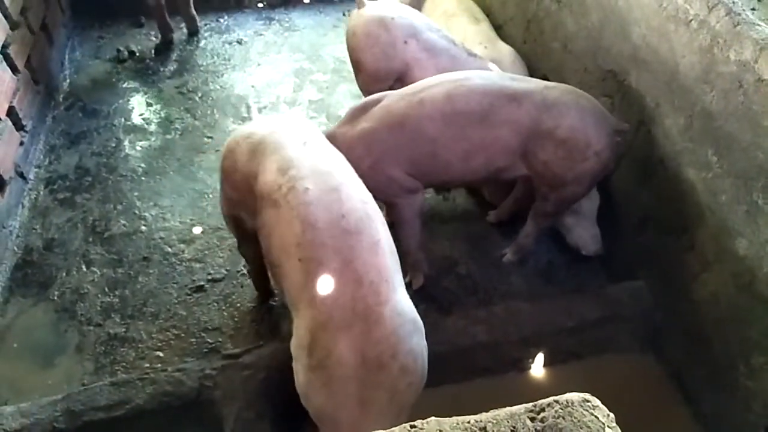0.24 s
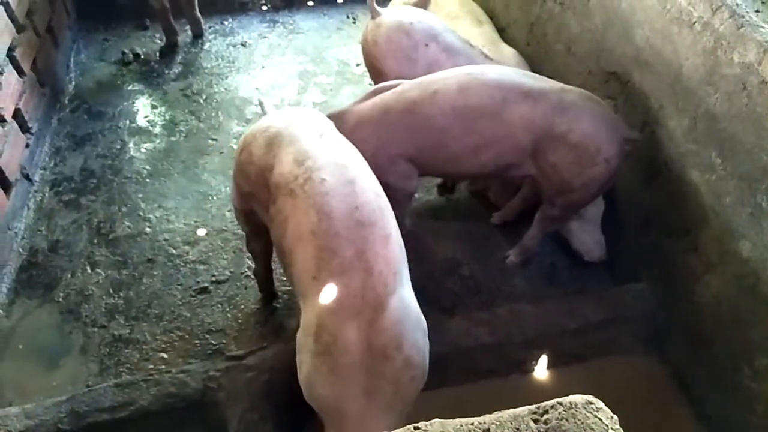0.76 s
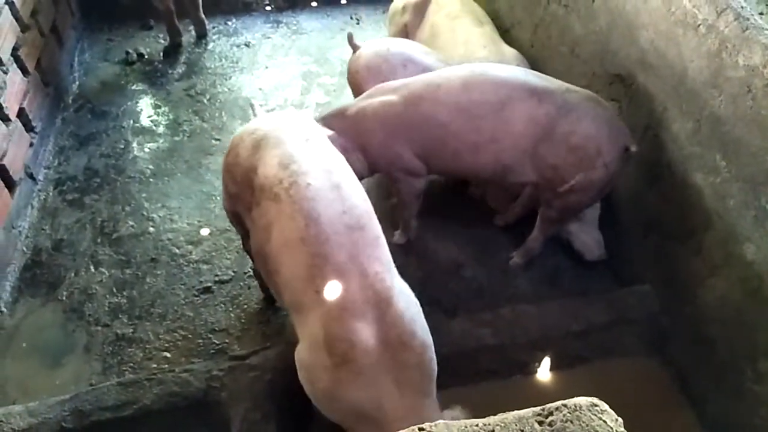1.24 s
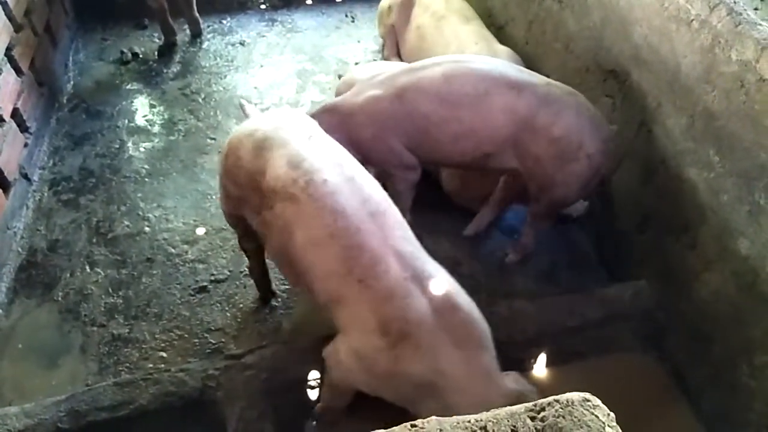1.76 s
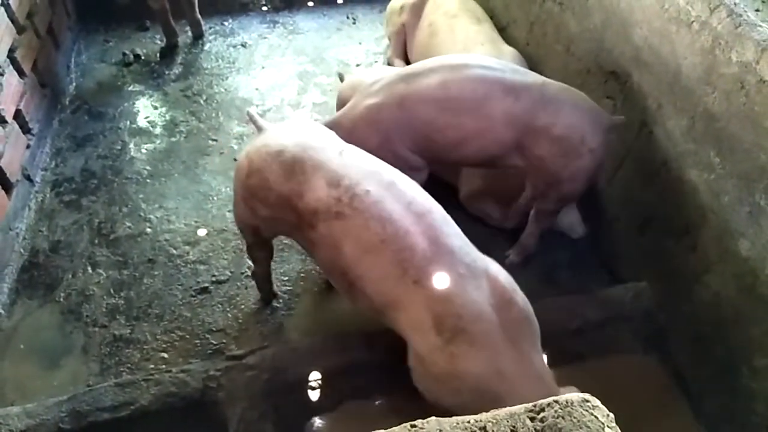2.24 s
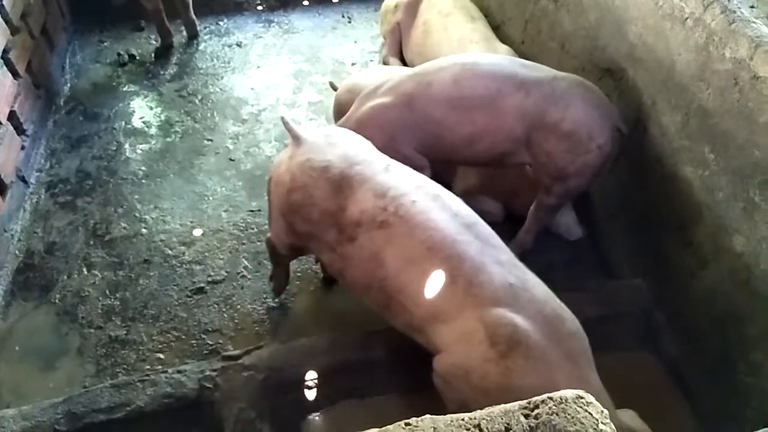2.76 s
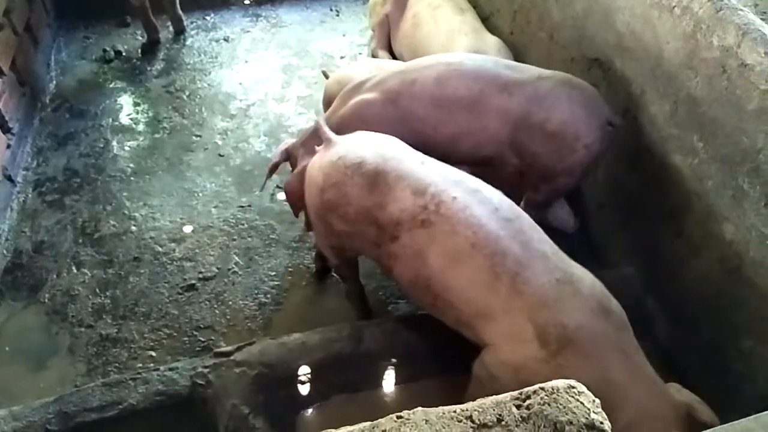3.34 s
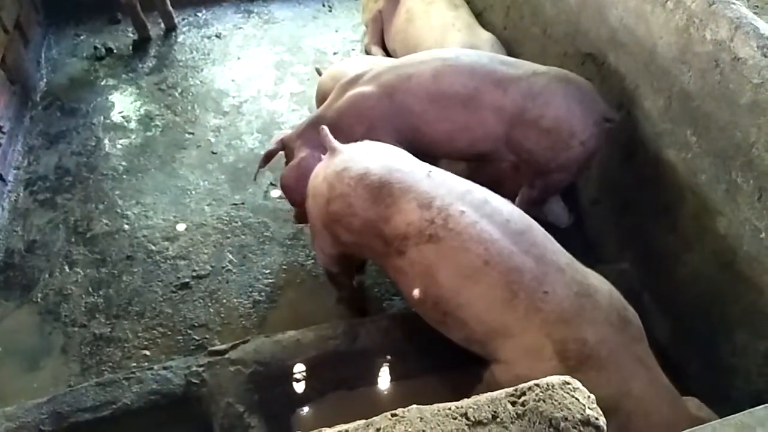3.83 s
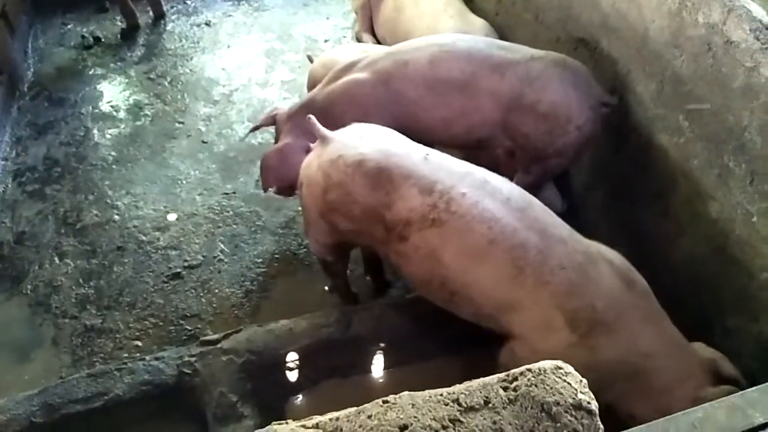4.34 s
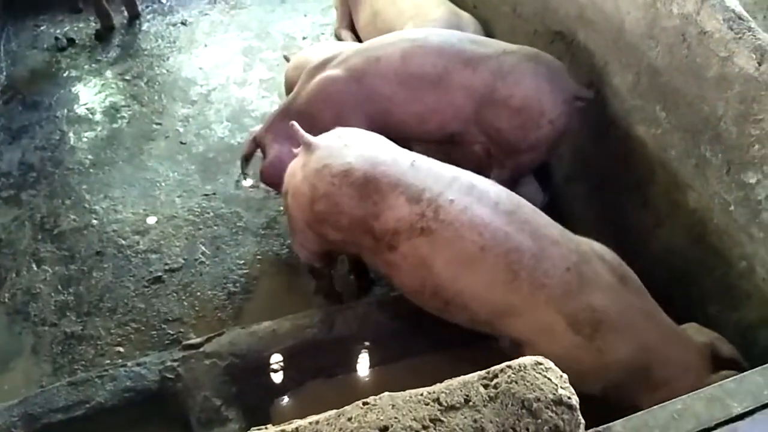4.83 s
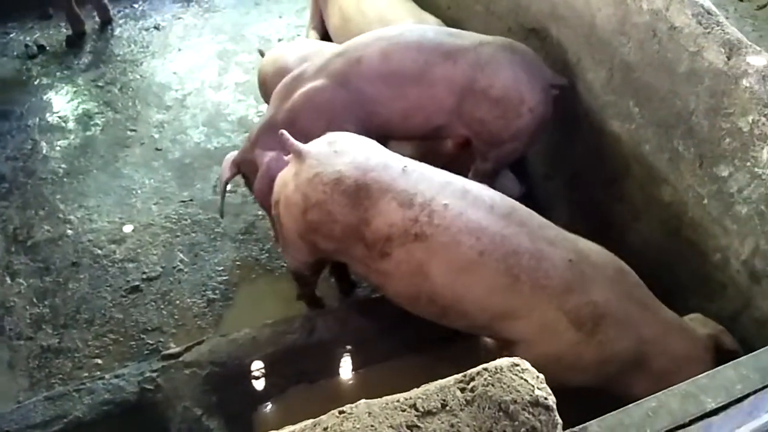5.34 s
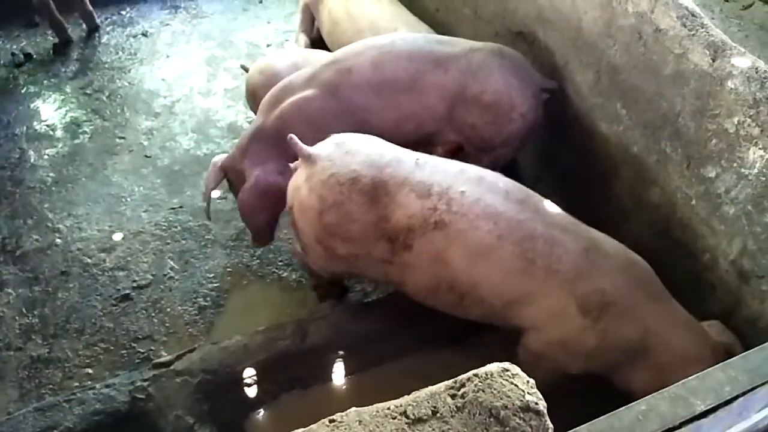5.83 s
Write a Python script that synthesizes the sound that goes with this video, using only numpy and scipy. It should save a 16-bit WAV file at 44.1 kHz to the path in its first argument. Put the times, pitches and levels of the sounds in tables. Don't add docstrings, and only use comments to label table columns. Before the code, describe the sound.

Pigs grunt low and rough while snouts slurp, smack and splash in a shallow puddle inside a bare, echoing concrete pen.

```python
import sys
import numpy as np
from scipy import signal
from scipy.fft import rfft, irfft
from scipy.io import wavfile
from scipy.ndimage import uniform_filter1d

SR = 44100
rng = np.random.default_rng(int(sys.argv[2]) if len(sys.argv) > 2 else 0)


def materialize(psi):
    bounded = np.clip(np.atleast_2d(psi).T, -1, 1)
    quanta = np.round(bounded * 32767).astype(np.int16)
    wavfile.write(sys.argv[1], SR, quanta)


def ratio(d):
    e = np.asarray(d, float) / 20
    return 10 ** e


N = 268436

# frequency in Hz, level in dB per Hz.
AIR_SPECTRUM = [(26, 2), (71, 1), (422, -8.5), (976, -13.5), (1270, -23), (2140, -13), (6260, -20),
                (15600, -17.5)]
# frequency in Hz, t60 in seconds.
PEN_DECAY = [(200, 0.45), (1500, 0.38), (5000, 0.42), (12000, 0.41)]
# start in seconds, peak level in dB, pitch in Hz.
THUDS = [(0.031, -34.5, 50.8), (0.277, -43.5, 64.4), (0.655, -33.5, 86.5), (0.816, -35.5, 59),
         (1.602, -41.5, 82), (1.915, -37.5, 78.4), (2.16, -44, 58), (2.4, -45, 79), (2.582, -33, 92.3),
         (3.008, -34.5, 69.4), (3.281, -46, 62.5), (4.367, -39.5, 82), (5.191, -43, 58.4),
         (5.829, -44.5, 107.7), (5.947, -52.5, 148.5)]
# start in seconds, length in seconds, level in dB, pitch in Hz.
SQUEALS = [(4.104, 0.23, -57.5, 671.7)]
SQUEAL_TONES_DB = (-0.5, 4.5, 5.5)
# frequency in Hz, t60 in seconds.
RING_MODES = [(5755, 0.24), (6655, 0.24), (10555, 0.042), (13440, 0.11)]
# start in seconds, first mode in dB, then three upper modes in dB over the first.
CLINKS = [(0.9879, -60.5, -21, -35, -25), (1.822, -73.5, 17, -14, 3), (2.177, -56.5, 1.5, -25, -18),
          (2.368, -52.5, -6, -20, -25), (2.6808, -46, -1.5, -5, -16), (2.8433, -44.5, -17, -7, -14),
          (3.101, -45, -16.5, -6, -6), (3.488, -54, -1.5, -23, -17), (3.982, -63, 4, -42, -51),
          (4.52, -59, -16, -12, 1), (5.581, -59, 7, -3, -22)]
# time in seconds, level in dB.
STIRRING = [(0.0, -32), (0.27, -52.5), (0.68, -50.5), (1.4, -52), (1.54, -45.5), (1.81, -43), (2.52, -48),
            (2.83, -47.5), (3.19, -53), (3.41, -64), (3.56, -54), (3.78, -54), (4.32, -47.5), (4.95, -53),
            (5.22, -53), (5.53, -68), (5.69, -43.5), (6.09, -46.5)]
# frequency in Hz, level in dB per Hz.
GURGLE_SPECTRUM = [(290, -73), (500, -9.5), (1300, 1.5), (2390, 0), (3300, -11.5), (4290, -59),
                   (7260, -120)]
# frequency in Hz, level in dB per Hz.
FIZZ_SPECTRUM = [(1410, -29), (2400, -2.5), (3810, -6.5), (4950, -3.5), (7500, -22.5), (9750, -44),
                 (16500, -120)]
# frequency in Hz, level in dB per Hz.
SNIFF_SPECTRUM = [(4410, -31), (7500, -9), (9190, -13), (10500, -13), (12700, -1), (15600, -9.5)]
# start in seconds, splash in dB, hiss in dB over it, rise in seconds,
# t60 in seconds.
SPRAYS = [(0.004, -25.5, -12, 0.14, 0.092), (5.98, -36, -16, 0.045, 0.39), (1.63, -45.5, -2, 0.01, 0.71),
          (1.6894, -57, 15, 0.014, 0.05), (2.128, -36.5, -0.5, 0.047, 0.18), (2.33, -35, -9, 0.015, 0.16),
          (2.546, -29.5, -39, 0.1, 0.29), (3.3283, -47, 20.5, 0.0023, 0.036), (3.35, -42, -36, 0.003, 0.14),
          (3.625, -32, -21, 0.0062, 0.053), (4.02, -38, -13, 0.019, 0.22),
          (4.638, -23, -15.5, 0.011, 0.095), (4.692, -23, 5, 0.014, 0.048), (4.897, -23, -7, 0.04, 0.1),
          (4.82, -38.5, 2.5, 0.03, 0.12), (5.109, -42, -4, 0.0021, 0.17), (5.498, -25, 2, 0.023, 0.041),
          (5.878, -25, 3.5, 0.017, 0.043)]
# start in seconds, peak level in dB, pitch in Hz.
TICKS = [
    (3.018, -30.5, 4250),
    (3.576, -49, 1530),
    (4.292, -35, 2730),
    (4.707, -39, 10500),
    (4.717, -32, 9000),
    (4.749, -33, 1320),
    (4.927, -34, 2600),
]
# start in seconds, length in seconds, level in dB, pitch in Hz.
LOW_WHISTLES = [(0.085, 0.065, -38.5, 454), (0.2, 0.089, -59, 1846), (0.464, 0.2, -57, 897),
                (0.484, 0.089, -67, 330), (0.519, 0.087, -66, 1310), (0.534, 0.092, -44.5, 352),
                (0.574, 0.085, -52.5, 1575), (0.639, 0.076, -41, 228), (0.763, 0.086, -61, 2050),
                (0.883, 0.052, -51.5, 379), (1.217, 0.09, -60, 1630), (1.586, 0.18, -59, 2095),
                (1.606, 0.13, -55, 1966), (1.756, 0.1, -47, 369), (1.951, 0.1, -56, 802),
                (1.956, 0.105, -51, 250), (2.095, 0.14, -53, 2154), (2.27, 0.053, -52, 1300),
                (2.27, 0.17, -58, 1236), (2.365, 0.12, -60, 864), (2.619, 0.16, -54, 1396),
                (2.619, 0.18, -52, 2154), (2.639, 0.115, -54, 1900), (2.649, 0.076, -47.5, 842),
                (2.878, 0.053, -50, 1710), (2.933, 0.099, -52, 1068), (3.332, 0.095, -41, 296.5),
                (3.347, 0.065, -50.5, 890), (3.756, 0.13, -56, 1517), (4.011, 0.13, -55.5, 1600),
                (4.295, 0.077, -50, 1455), (4.33, 0.2, -55, 1234), (4.44, 0.19, -57, 1886),
                (4.834, 0.051, -57, 2080), (4.999, 0.15, -61, 1606), (5.059, 0.14, -58, 1086),
                (5.667, 0.079, -42, 1450), (5.762, 0.038, -51, 1340), (5.767, 0.071, -42, 367),
                (5.882, 0.12, -59.5, 330)]
# start in seconds, length in seconds, level in dB, pitch in Hz.
HIGH_WHISTLES = [(0.0, 0.059, -44, 3220), (0.0, 0.074, -51, 3860), (0.005, 0.15, -47, 2510),
                 (0.02, 0.19, -49, 2357), (0.389, 0.11, -61.5, 3020), (0.459, 0.1, -62, 4590),
                 (0.614, 0.073, -42, 2500), (0.649, 0.092, -42.5, 2280), (0.833, 0.12, -59.5, 2645),
                 (1.796, 0.067, -44, 2520), (1.816, 0.084, -42.5, 2852), (1.985, 0.13, -56, 3470),
                 (2.115, 0.16, -61, 3010), (2.115, 0.21, -59, 5100), (2.335, 0.063, -51.5, 2865),
                 (2.619, 0.18, -52, 2730), (2.724, 0.075, -55, 2960), (2.849, 0.12, -57, 4770),
                 (2.883, 0.1, -49, 2430), (2.913, 0.087, -54, 2263), (3.098, 0.072, -57.5, 2260),
                 (3.357, 0.069, -40, 2310), (3.362, 0.076, -44, 3310), (3.372, 0.066, -48, 4600),
                 (3.9, 0.099, -66, 3970), (3.92, 0.1, -61.5, 3060), (4.225, 0.1, -51, 2330),
                 (4.24, 0.072, -58.5, 6030), (4.26, 0.12, -43.5, 2868), (4.52, 0.09, -58.5, 2986),
                 (4.535, 0.1, -58.5, 2820), (4.624, 0.082, -55, 4660), (4.629, 0.07, -48.5, 3040),
                 (4.694, 0.04, -52, 2260), (4.739, 0.06, -45.5, 2930), (4.819, 0.08, -58, 4920),
                 (4.939, 0.049, -46.5, 2375), (4.999, 0.18, -58, 4990), (5.478, 0.11, -53.5, 2250),
                 (5.657, 0.12, -40.5, 2352), (5.672, 0.14, -54, 4510), (5.677, 0.06, -49, 2760),
                 (5.917, 0.11, -50, 3020), (6.036, 0.055, -53, 3680)]
# start in
# seconds, peak level in dB, pitch in Hz, # width as a share # of the pitch, t60 in seconds.
HOLLOWS = [(0.86, -48, 3075, 0.046, 0.56), (0.97, -43, 2110, 0.16, 0.22), (1.141, -48, 3000, .08, 0.46),
           (1.37, -46.5, 676, 0.32, .06), (2.228, -44, 7570, 0.06, 0.02), (2.44, -45.5, 1270, .14, 0.18),
           (3.37, -36.5, 5090, 0.12, 0.11), (4.001, -49, 250, 0.21, 0.11), (4.119, -46, 3310, 0.17, 0.09),
           (4.36, -44.5, 5100, 0.16, 0.15), (4.39, -53, 1974, 0.025, 0.66), (4.53, -45.5, 1244, 0.11, 0.58),
           (5.099, -41.5, 1597, 0.1, 0.35), (5.25, -47.5, 2130, .07, .36), (5.295, -52, 3740, 0.08, 0.52),
           (5.331, -50.5, 4970, 0.24, 0.4)]
# start in seconds, peak level in dB, cavity pitch
# in Hz, width as a share of the pitch, # t60 in seconds.
SNORTS = [
    (1.103, -47.5, 193, 0.65, 0.094),
    (1.289, -49, 349, 0.26, 0.42),
    (1.58, -41, 187, 0.98, 0.072),
    (1.611, -45.5, 170, 0.47, 0.063),
    (3.887, -49, 530, 0.27, 0.05),
    (4.038, -42.5, 695, 0.92, 0.71),
    (4.599, -51.5, 614, 0.069, 0.11),
    (0.455, -46.5, 362, 0.18, 1),
]
# start in seconds, peak level in dB, cavity pitch in Hz, t60 in seconds.
DRIPS = [(0.4514, -46.5, 3340, 0.44), (1.0676, -42, 4360, 0.05), (1.242, -42.5, 4260, 0.18),
         (1.719, -41.5, 4010, 0.026), (2.142, -43, 4050, 0.081), (2.2314, -44.5, 3770, 0.26),
         (2.8194, -30.5, 5070, 0.03), (3.019, -32.5, 4510, 0.029), (3.3535, -33, 3680, 0.18),
         (4.2302, -53, 6000, 0.39), (4.2792, -44, 5170, 0.21), (4.909, -41, 4270, .073),
         (5.4983, -37, 4920, 0.028), (5.8291, -36, 3370, 0.25)]
# start in seconds, peak level in dB, cavity pitch in Hz, t60 in seconds.
PLOPS = [(0.379, -47, 756, 0.2), (0.587, -31.5, 2820, 0.12), (0.986, -51, 890, 0.06),
         (1.098, -49.5, 834, 0.088), (1.1054, -43, 2050, 0.62), (1.521, -34.5, 2310, 0.032),
         (2.2001, -29.5, 1684, 0.051), (2.5466, -23, 3370, 0.062), (2.571, -26, 3380, 0.049),
         (3.0574, -46.5, 3130, 0.17), (3.5755, -43.5, 1610, 0.035), (3.7742, -39, 2104, 0.043),
         (3.9, -41.5, 1450, 0.21), (4.0286, -30.5, 2190, 0.013), (4.291, -29.5, 2735, 0.027),
         (4.6423, -31, 1850, 0.2), (4.651, -36, 1137, 0.037), (5.426, -51, 890, 0.054),
         (5.496, -30, 2390, 0.059), (5.642, -29.5, 2990, 0.14), (5.6979, -20.5, 2810, 0.079)]
# start in seconds, peak level in dB, cavity pitch in Hz, t60 in seconds.
SMACKS = [(0.4968, -38, 2470, 0.13), (0.6801, -20, 2410, 0.047), (1.0092, -39.5, 2770, 0.2),
          (1.244, -29.5, 2040, 0.068), (1.2863, -35, 3666, 0.094), (1.4601, -39, 2020, 0.35),
          (1.693, -32.5, 2910, 0.13), (2.0071, -41.5, 4970, 0.14), (2.2692, -30, 2090, 0.07),
          (2.825, -29.5, 2700, 0.087), (2.8955, -23.5, 1985, 0.043), (2.9473, -33.5, 4680, 0.059),
          (3.371, -24, 3400, 0.042), (3.6249, -34, 1840, 0.2), (3.627, -36, 3590, 0.34),
          (4.642, -29.5, 3530, 0.099), (4.7132, -31.5, 2300, 0.18), (4.7512, -29.5, 1490, 0.053),
          (4.9084, -33, 2110, 0.24), (5.0097, -33.5, 2680, 0.23), (5.5199, -37, 2320, 0.2),
          (5.9374, -37, 4530, 0.083)]
# start in seconds, peak level in dB, cavity pitch in Hz, t60 in seconds.
GULPS = [(1.241, -33, 1050, 0.19), (1.621, -41.5, 950, 0.66), (2.132, -30.5, 816, 0.03),
         (2.199, -29, 964, 0.02), (2.738, -37, 812, 0.043), (2.903, -32.5, 1490, 0.23),
         (3.574, -46.5, 980, 0.18), (3.623, -38, 830, 0.21), (3.665, -34, 870, 0.021),
         (4.022, -39.5, 950, 0.13), (4.75, -29.5, 1105, 0.011), (4.919, -36.5, 1290, 0.12),
         (5.648, -43.5, 367, 0.31)]
# start in seconds, peak level in dB, cavity pitch in Hz, t60 in seconds.
LIP_CLICKS = [
    (2.133, -30, 797, 0.016),
    (2.199, -39, 1670, 0.026),
    (2.896, -22.5, 1820, 0.026),
    (4.714, -23, 2410, 0.035),
    (4.749, -26.5, 1372, 0.024),
    (5.497, -40.5, 2340, 0.069),
]
# time in seconds, pitch in Hz, first harmonic in dB, second in dB.
CLEAR_VOICES = [
    [(2.515, 249, -54, -74), (2.531, 246, -36, -82), (2.543, 240.5, -33.5, -56),
     (2.617, 260.5, -22.5, -31.5), (2.633, 256.8, -57, -59), (2.669, 252.8, -32, -45),
     (2.693, 269, -38.5, -72), (2.705, 242, -54, -57), (2.75, 232, -71, -54)],
    [(3.325, 338, -46, -87), (3.345, 341, -48, -93), (3.349, 343, -49, -73), (3.381, 347, -40, -71),
     (3.389, 358, -30.5, -50), (3.427, 358, -31.5, -71), (3.503, 336, -54, -82), (3.519, 354, -76, -88),
     (3.56, 366, -69, -77)],
    [(5.645, 203, -64, -59), (5.671, 205, -53, -33), (5.699, 212.5, -32.5, -39.5),
     (5.735, 244.3, -31.5, -52), (5.793, 235.3, -33, -34.5), (5.803, 231, -50, -62),
     (5.835, 244.6, -54, -45), (5.857, 243, -59, -73), (5.87, 242, -64, -48)],
]
# start, peak and end in seconds, peak effort in dB, chest pitch in Hz.
GRUNTS = [
    (-0.07, 0.102, 0.34, -28.5, 355),
    (0.568, 0.689, 0.92, -29.5, 346.4),
    (1.759, 1.849, 2.001, -29, 348),
    (3.326, 3.402, 3.57, -29.5, 351),
    (4.211, 4.344, 4.47, -36.5, 317.8),
    (5.029, 5.074, 5.225, -43.5, 364.7),
    (2.514, 2.6, 2.705, -21.5, 261.5),
    (5.642, 5.734, 5.95, -32, 239.6),
]
# chest cycles per fold pulse, roughness 0-1, overtone in dB, undertone in dB.
VOICES = [(6.7, .65, -7.5, -2), (4.0, 0.75, -8.5, -6), (5.5, 0.75, -9, -3), (1.3, 0.7, -26, -20),
          (5.4, .6, -29, -8), (5.0, 0.93, -0.5, -37), (2.3, .5, -9, -7), (2, 0.4, -1, -19)]
# mouth in Hz, mouth in dB over the chest, snout in Hz, snout in dB over the chest.
HEADS = [(1516, -6.5, 3150, -9.5), (1490, -3.5, 3000, -6), (1550, -4, 2670, -5), (886, -14, 2130, -8),
         (1600, -2, 2500, 2), (890, 2.3, 2040, 3.5), (1123, -13, 2220, -14.5), (1357, 0.5, 2440, -5.5)]
CHEST_DB = [-2.5, 0, -2, -8.5, -0.1, 2.5, -3.5, 0]


def evened(x):
    return x / np.sqrt(np.mean(x ** 2) + 1e-20)


def read(points, hz):
    f, value = np.transpose(points)
    return np.interp(np.log(hz + 1), np.log(f + 1), value)


def add(mix, s, sound):
    part = mix[round(s * SR):][:len(sound)]
    part += sound[:len(part)]


def colour(x, points):
    gain = ratio(read(points, np.fft.rfftfreq(len(x), 1 / SR)))
    return evened(irfft(rfft(x) * gain, len(x)))


def resonate(x, hz, width):
    turn = np.exp(2j * np.pi * np.cumsum(hz * np.ones(len(x))) / SR)
    r = np.exp(-np.pi * width / SR)
    smooth = signal.lfilter([(1 - r) ** 2], [1, -2 * r, r * r], x / turn + 1e-18)
    return 2 * (turn * smooth).real


def patchy(patchy_db, frames, bins):
    a, b, patches = rng.standard_normal((N // 128 + 5, 257, 3)).T
    patches = evened(uniform_filter1d(uniform_filter1d(patches, bins, 0), frames, 1))
    return signal.istft((a + 1j * b) * ratio(patchy_db * patches), nperseg=512, noverlap=384)[1][:N]


def room_air():
    return ratio(-65.5) * colour(patchy(0.46, 20, 6), AIR_SPECTRUM)


def pen(x, wet_db):
    taps = np.zeros(SR)
    at = np.arange(200, SR - 20, 20)
    taps[at + rng.integers(0, 20, len(at))] = rng.choice([-1., 1.], len(at))
    hz, t, z = signal.stft(taps, SR, nperseg=256)
    tail = signal.istft(z * ratio(-60 * t / read(PEN_DECAY, hz)[:, None]), SR, nperseg=256)[1]
    return x + ratio(wet_db) * signal.fftconvolve(x, tail / np.linalg.norm(tail))[:N]


def thuds():
    out, t = np.zeros(N), np.arange(SR // 2) / SR
    t60_s, rise_s = 0.34, 0.013
    for (s, db, hz), noise in zip(THUDS, rng.standard_normal((len(THUDS), len(t)))):
        shake = np.sin(2 * np.pi * hz * t) + 0.73 * evened(resonate(noise, hz, 58))
        add(out, s, ratio(db - 60 * t / t60_s) * (1 - np.exp(-t / rise_s)) * shake)
    hum = evened(resonate(patchy(4.5, 20, 2), 56.7, 24))
    return out + ratio(-62.0) * hum


def squeals():
    out = np.zeros(N)
    pitch_wobble = 0.0084
    for s, length, db, hz in SQUEALS:
        drift = uniform_filter1d(rng.standard_normal((round(length * SR), 4)), size=1500, axis=0).T
        turns = np.cumsum(hz * (1 + pitch_wobble * evened(drift[0]))) / SR
        voice = np.zeros(len(turns))
        for k, tone_db in enumerate(SQUEAL_TONES_DB, 1):
            voice += ratio(tone_db + 1.5 * evened(drift[k])) * np.sin(2 * np.pi * k * turns)
        add(out, s, ratio(db) * voice * signal.windows.tukey(len(turns), .3))
    return out


def clinks():
    out, t = np.zeros(N), np.arange(SR // 2) / SR
    attack = 1 - np.exp(-t / 0.00065)
    for s, db, *upper in CLINKS:
        rattle = 1 + 0.2 * evened(uniform_filter1d(rng.standard_normal(len(t)), size=300))
        for (hz, t60), rel_db in zip(RING_MODES, [0, *upper]):
            add(out, s, ratio(db + rel_db - 60 * t / t60) * np.sin(2 * np.pi * hz * t) * attack * rattle)
    return out


def bubbles(points, per_s, lo_hz, hi_hz, wash_db):
    size = ratio(2.5 * np.minimum(rng.exponential(1, N), 2.0)) * (rng.random(N) < per_s / SR)
    kind, out = rng.integers(0, 24, N), np.zeros(N)
    for k, hz in enumerate(np.geomspace(lo_hz, hi_hz, 24)):
        u = np.arange(1200) / SR * hz
        chirp = np.sin(2 * np.pi * (u + 0.00311 * u ** 2))
        grain = chirp * np.exp(-u / 7.9) * (1 - np.exp(-u / 2.0))
        out += signal.oaconvolve(size * (kind == k), grain * np.sqrt(hz / hi_hz))[:N]
    wet = pen(evened(out), 12.8)
    wash = colour(patchy(3.5, 50, 1), points)
    flat = [(f, db + 10 * np.log10(f / points[0][0])) for f, db in points]
    return evened(colour(wet, flat) + ratio(wash_db) * wash)


def puddle():
    t, froth = np.arange(N) / SR, np.zeros(N)
    froth_db, froth_t60_s, fizz_db = -32, 1, -10.5
    for s, db, *_ in SPRAYS:
        add(froth, s, ratio(db + froth_db - 60 * t[:SR] / froth_t60_s))
    stir = ratio(-2.5 + np.interp(t, *np.transpose(STIRRING)))
    gurgle = stir * bubbles(GURGLE_SPECTRUM, 500, 504.0, 3248, -8)
    fizz = (ratio(fizz_db) * stir + froth) * bubbles(FIZZ_SPECTRUM, 160, 2442, 6510, -7)
    return gurgle + fizz


def ticks():
    out, t = np.zeros(N), np.arange(2000) / SR
    decay_cycles = 1.3
    for s, db, hz in TICKS:
        add(out, s, ratio(db) * np.sin(2 * np.pi * hz * t) * np.exp(-t * hz / decay_cycles))
    return out


def sprays():
    splash, hiss, t = np.zeros(N), np.zeros(N), np.arange(SR // 2) / SR
    for s, db, hiss_db, rise, t60 in SPRAYS:
        swell = 1 - np.exp(-t / np.clip(rise, .001, .1))
        shape = ratio(db - 6.0 - 60 * t / np.clip(t60, .02, .6)) * swell
        add(splash, s - .003, shape)
        add(hiss, s - .003, ratio(hiss_db) * shape * (1 - np.exp(-(t / 0.018) ** 2)))
    drop_size = ratio(4.0 * np.minimum(rng.exponential(1, N), 3))
    drops = evened(drop_size * (rng.random(N) < 500 / SR) * rng.choice([-1, 1], N))
    water = colour(evened(patchy(0.45, 6, 20)) + ratio(2.0) * drops, FIZZ_SPECTRUM)
    breath = colour(patchy(0.97, 6, 30), SNIFF_SPECTRUM)
    return pen(splash * water + hiss * breath, 2.8)


def whistles(table):
    out = np.zeros(N)
    for (s, length, db, hz), air in zip(table, rng.standard_normal((len(table), SR // 2))):
        u = np.linspace(0, 1, round(length * SR))
        width_hz, sag_db = 30.4 + 0.024 * hz, -5
        tone = evened(resonate(air, hz, width_hz)[-len(u):])
        add(out, s, ratio(db + sag_db * (u - .5)) * tone * signal.windows.tukey(len(u), .35))
    return out


def wet_pops(table):
    out, t = np.zeros(N), np.arange(8000) / SR
    rush = rng.standard_normal((len(table), len(t)))
    for (s, db, hz, width, t60), air in zip(table, rush):
        band = hz * np.clip(width, .03, 1)
        breath = air * abs(air) * ratio(-60 * t / np.clip(t60, .01, .6)) * (1 - np.exp(-t / 0.0051))
        snap = np.exp(-((t - .003) / 0.00059) ** 2) * np.cos(2 * np.pi * hz * t)
        pop = resonate(breath + 0.28 * snap * np.sqrt(band / 300), hz, band)
        add(out, s - .003, ratio(db) * pop / abs(pop).max())
    return out


def cavity_pops(table, width):
    return wet_pops([(s, db, hz, width, t60) for s, db, hz, t60 in table])


def clear_voices():
    out = np.zeros(N)
    for curve in CLEAR_VOICES:
        s, hz, first_db, second_db = np.transpose(curve)
        t = np.arange(s[0], s[-1], 1 / SR)
        phase = 2 * np.pi * np.cumsum(np.interp(t, s, hz)) / SR
        first = ratio(np.interp(t, s, first_db)) * np.sin(phase)
        second = ratio(np.interp(t, s, second_db)) * np.sin(2 * phase)
        add(out, s[0], np.sqrt(2) * (first + second) * signal.windows.tukey(len(t), .1))
    return out


def grunt(call, voice, head, chest_db):
    *s, peak_db, top_hz = call
    cycles, rough, over_db, under_db = voice
    mouth_hz, mouth_db, snout_hz, snout_db = head
    t = np.arange(max(s[0], 0), s[-1], 1 / SR)
    climb_db = np.interp(t, s, [-18, 0, -33.5])
    effort_db = peak_db + uniform_filter1d(climb_db, round(0.041 * SR))
    chest_hz = top_hz * (1 - 0.16 * np.interp(t, s[:2], [1, 0]) ** 2)
    width = 192 if rough > .55 else 78

    wobble, air, strength = rng.standard_normal((len(t), 3)).T
    jitter = 1 + .25 * rough * evened(uniform_filter1d(wobble, size=500))
    turns = np.cumsum(chest_hz / cycles * jitter) / SR
    pulses = (np.diff(np.floor(turns), prepend=0) > 0) * ratio(6.0 * rough * np.clip(strength, -1.5, 1.5))
    puffs = (0.25 + np.exp(-(turns % 1) / 0.45)) * air
    drive = (1 - rough) * evened(pulses) + rough * evened(puffs)

    base = resonate(drive, chest_hz, width)
    over = resonate(drive, 2 * chest_hz, 1.52 * width)
    under = resonate(drive, chest_hz / 2, 51) + ratio(-4.5) * resonate(drive, 3 * chest_hz / 2, 48)
    chest = evened(base + ratio(over_db) * over + ratio(under_db) * np.std(base) * evened(under))
    mouth = evened(resonate(drive, mouth_hz, 190) - ratio(-4.5) * resonate(drive, 0.686 * mouth_hz, 296))
    snout = evened(resonate(drive, snout_hz, 210) - ratio(-7.5) * resonate(drive, 0.858 * snout_hz, 320)
                   + ratio(-2.0) * resonate(drive, 1.082 * snout_hz, 360))
    opening = ratio(0.12 * (effort_db - peak_db))
    whole = ratio(chest_db) * chest + opening * (ratio(mouth_db) * mouth + ratio(snout_db) * snout)
    return t[0], ratio(effort_db) * whole * signal.windows.tukey(len(t), .05)


def scene():
    background = thuds() + pen(squeals(), 1.26) + pen(clinks(), -1.3)
    water = puddle() + sprays()
    whistling = pen(whistles(LOW_WHISTLES) + whistles(HIGH_WHISTLES), -9.5)
    pops = [wet_pops(HOLLOWS), wet_pops(SNORTS), cavity_pops(DRIPS, 0.16), cavity_pops(PLOPS, 0.15),
            cavity_pops(SMACKS, 0.41), cavity_pops(GULPS, 0.4)]
    mouths = sum(pen(x, 1.26) for x in pops)
    close = pen(cavity_pops(LIP_CLICKS, 0.29) + ticks(), -6)
    grunts = np.zeros(N)
    for row in zip(GRUNTS, VOICES, HEADS, CHEST_DB):
        add(grunts, *grunt(*row))
    voices = ratio(-1.0) * pen(grunts, -3.5) + pen(clear_voices(), -16)
    return (background + water + whistling + mouths + close + voices)[None]


def gate(x):
    z = signal.stft(x, nperseg=512, noverlap=384)[2]
    power = uniform_filter1d(uniform_filter1d(abs(z) ** 2, size=3, axis=0), size=13, axis=1)
    power_db = 10 * np.log10(power + 1e-16)
    usual_db = uniform_filter1d(np.median(power_db, axis=1), size=15)[:, None]
    keep_db = np.clip(power_db - usual_db - 1.5, -10, 0)
    return signal.istft(z * ratio(keep_db), nperseg=512, noverlap=384)[1][:N]


def roll_off(x):
    return signal.sosfilt(signal.butter(12, 15800, fs=SR, output="sos"), x)


def record(dry):
    x = gate(dry[0]) + room_air()
    x = signal.lfilter(*signal.butter(2, 42, "high", fs=SR), x)
    x = signal.oaconvolve(x, signal.firwin(511, 15650, window=("kaiser", 9), fs=SR), "same")
    return roll_off(x[None])


dry = scene()
out = record(dry)
materialize(out)
```